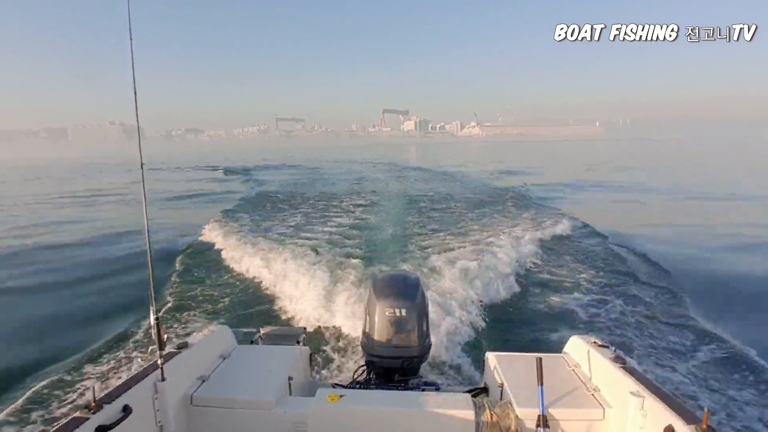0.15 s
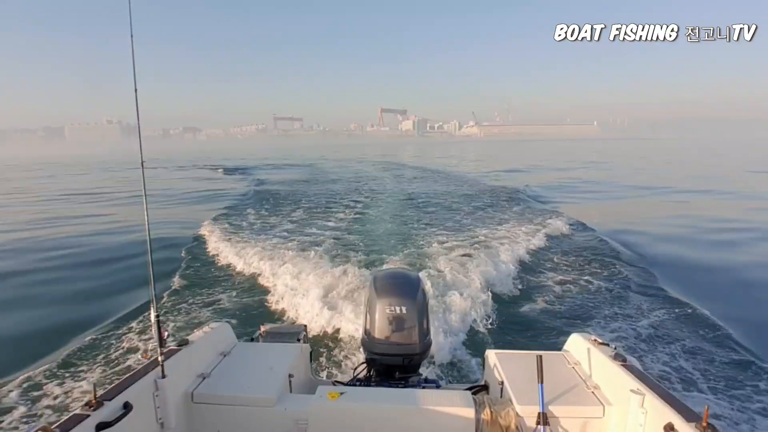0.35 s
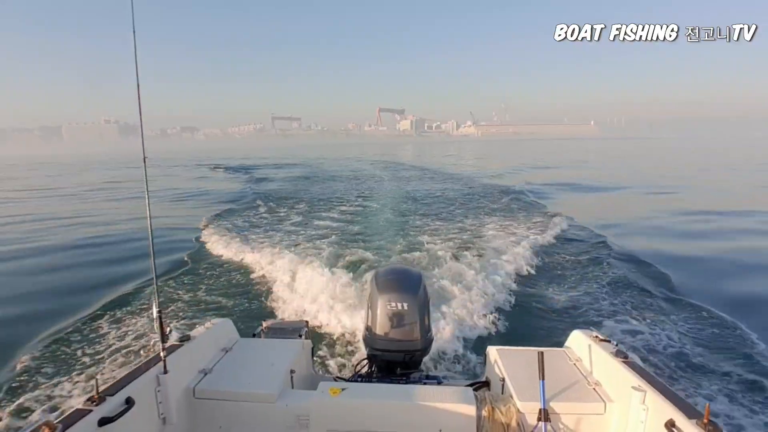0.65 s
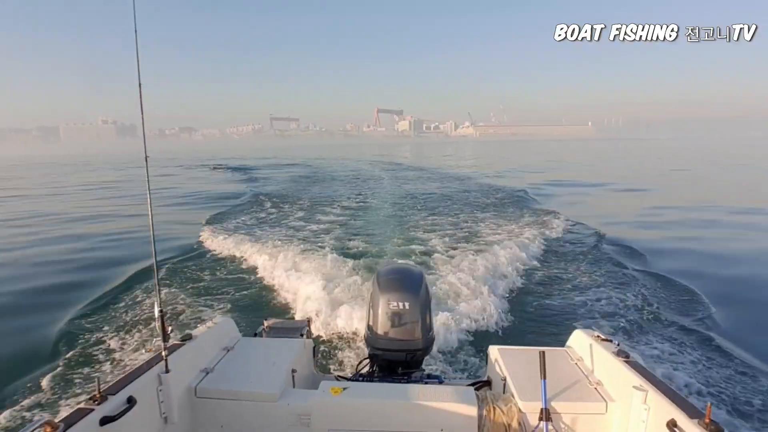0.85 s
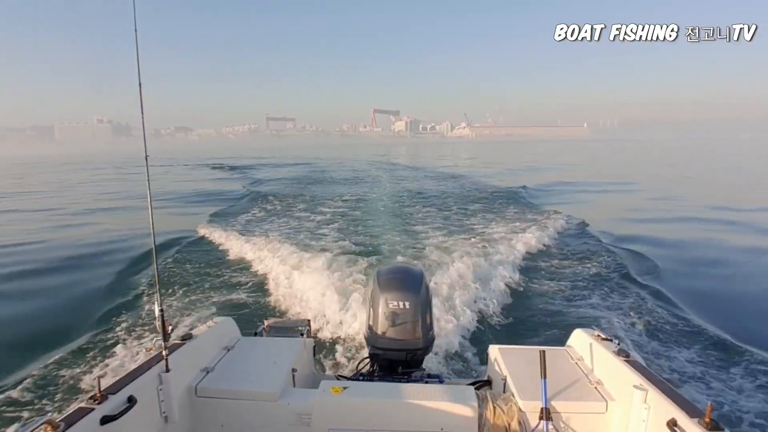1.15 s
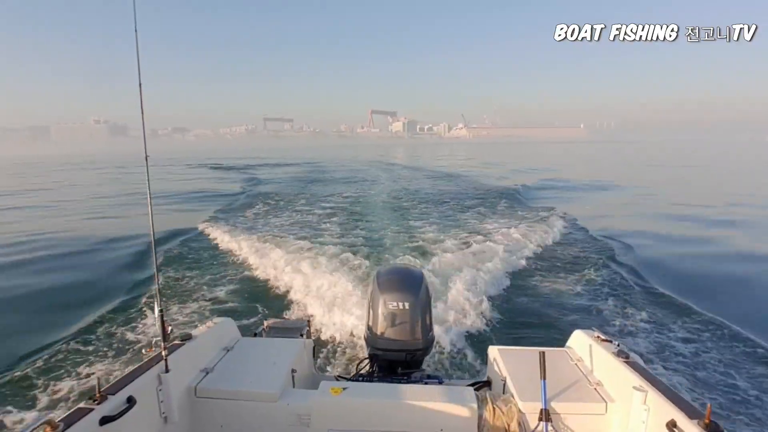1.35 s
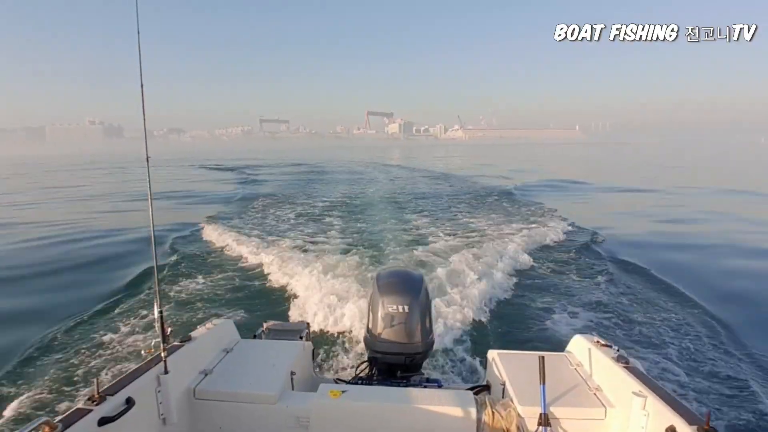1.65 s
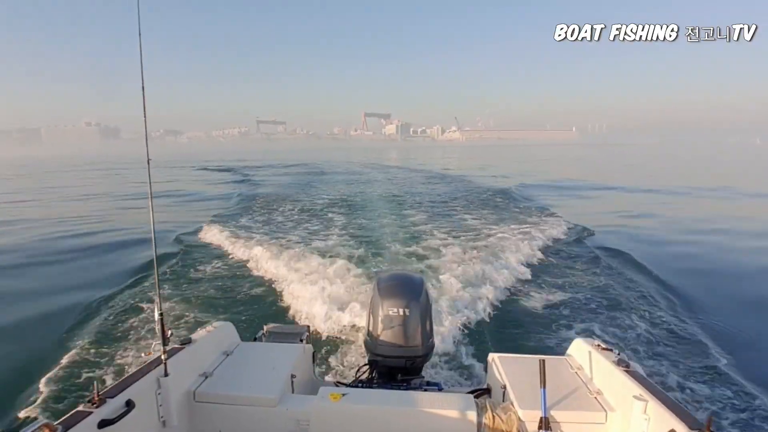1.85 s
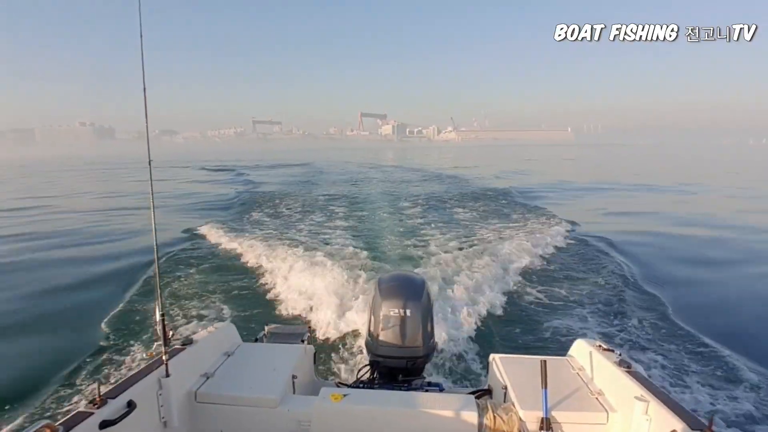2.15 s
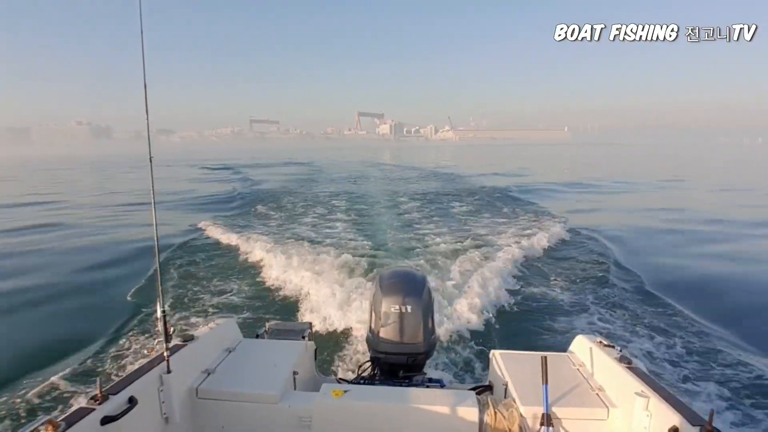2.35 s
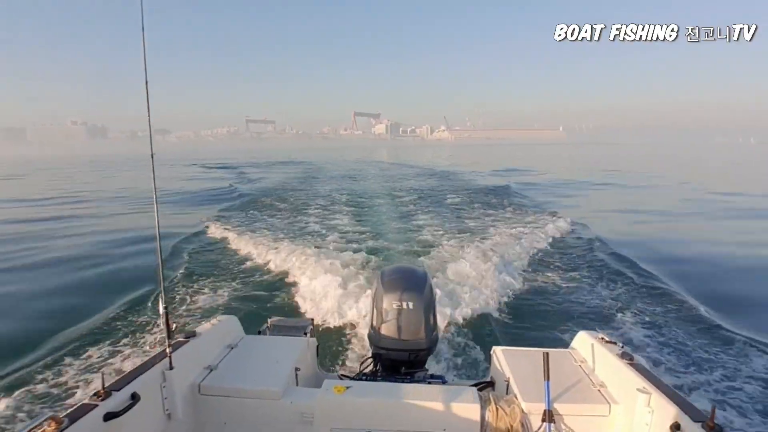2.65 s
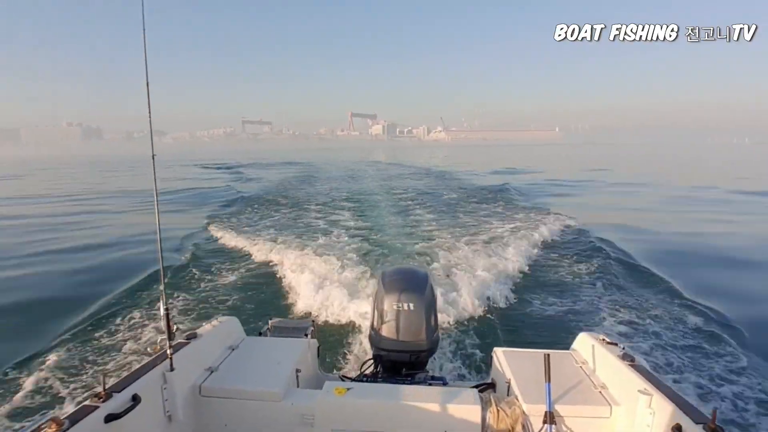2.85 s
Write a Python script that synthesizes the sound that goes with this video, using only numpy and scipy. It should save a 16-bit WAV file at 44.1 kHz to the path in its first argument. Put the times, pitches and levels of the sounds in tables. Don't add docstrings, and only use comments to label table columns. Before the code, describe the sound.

Constant deep hum of a small boat's outboard at cruising speed on open water, close stereo microphone on deck; rattling cover, wavering high gear whine and wide spray hiss continue throughout without any stop.

```python
import sys
import numpy as np
from scipy import signal
from scipy.fft import rfft, irfft
from scipy.io import wavfile

SR = 44100
rng = np.random.default_rng(int(sys.argv[2]) if len(sys.argv) > 2 else 0)


def transcribe(u):
    v = np.clip(np.atleast_2d(u).T, -1, 1)
    q = np.round(v * 32767).astype(np.int16)
    wavfile.write(sys.argv[1], SR, q)


def how_loud(loudness_db):
    steps = np.asarray(loudness_db, float) / 20
    return 10 ** steps


N = 132300
TIME = np.arange(N) / SR
LEFT_RIGHT_HALVES = np.array([[.5], [-.5]])


def rms_one(x):
    return x / np.sqrt(np.mean(x ** 2) + 1e-20)


def in_time(rows):
    seconds, *columns = np.transpose(rows)
    return [np.interp(TIME, seconds, column) for column in columns]


def at_hz(points, hz):
    points_hz, values = np.array(points).T
    return np.interp(np.log(hz), np.log(points_hz), values)


def drift(rate):
    pole = np.exp(-80 * np.pi * rate / SR)
    noise = rng.standard_normal(N // 40 + 2002)
    slow = signal.lfilter([1], [1, -2 * pole, pole * pole], noise)[2000:]
    slow = (slow - slow.mean()) / slow.std()
    return np.interp(np.arange(N) / 40, np.arange(len(slow)), slow)


def pair(mid, side, alike):
    alike = np.clip(alike, -1, 1)
    return np.sqrt(1 + alike) * mid + np.sqrt(1 - alike) * side * np.array([[1], [-1]])


def sides(pan_db):
    return how_loud(LEFT_RIGHT_HALVES * pan_db)


def ramp(start, length):
    return np.sin(np.pi / 2 * np.clip((TIME - start) / length, 0, 1)) ** 2


# pitch_hz, likeness (0 to 1)
WATER_LIKENESS = [(30, .96), (130, .97), (290, .96), (560, .7), (1000, .45), (2000, .4), (3500, .05),
                  (15000, 0)]
# pitch_hz, left_minus_right_db
WATER_PAN = [(60, -2.0), (130, -1.0), (290, -2.5), (640, -1.5), (1410, -1.0), (3100, 1.0), (6820, 1.5),
             (15000, -2.5)]


def water(spectrum, low_hz, high_hz, shared_db, own_db, rate):
    out, together = 0, drift(rate / 3)
    band_count = int(3 * np.log2(high_hz / low_hz))
    edges = low_hz * 2 ** (np.arange(band_count + 1) / 3)
    white = rng.standard_normal((2, 2, N + SR // 2))
    for k, (low, high) in enumerate(zip(edges, edges[1:])):
        band = signal.butter(2, [low, high], "band", fs=SR, output="sos")
        mid, side = signal.sosfilt(band, white[k % 2])[:, -N:]
        hz = np.sqrt(low * high)
        level_db = at_hz(spectrum, hz) + shared_db * together + own_db * drift(rate)
        gain = how_loud(level_db) * sides(at_hz(WATER_PAN, hz))
        out = out + gain * pair(mid, side, at_hz(WATER_LIKENESS, hz))
    return rms_one(out)


# pitch_hz, level_db (per Hz)
HULL_COLOUR = [(12, -58), (20, -19), (50, -7), (82, -5), (172, -11.5), (208, -15.5), (395, -10),
               (453, -15.5), (1150, -28.5), (1500, -69), (2530, -120)]
HULL_DB = -31.5


def hull_water():
    return how_loud(HULL_DB) * water(HULL_COLOUR, 20.08, 1150, shared_db=0.5, own_db=0.0, rate=2.0)


# pitch_hz, level_db (per Hz)
WAKE_COLOUR = [(900, -8), (1500, 2.5), (3200, -5.5), (4800, -1.5), (6400, -6), (7600, -18), (10000, -17.5),
               (15000, -17.5)]
# start_s, level_db
WAKE_SURGE = [(0.0, -39.5), (0.88, -38.5), (1.14, -40), (1.18, -38), (1.44, -40), (1.46, -36), (1.54, -39),
              (2.33, -38.5), (2.34, -37), (2.41, -39.5), (2.84, -38.5), (3.0, -40)]
WAKE_DB = 5.5
SURGE_SHARE, SURGE_TOP_HZ = .4, 7500


def wake(turn):
    surge_db, = in_time(WAKE_SURGE)
    spray = water(WAKE_COLOUR, 798, 20000, shared_db=.5, own_db=1.4, rate=28)
    high_pass = signal.butter(2, SURGE_TOP_HZ, "high", fs=SR, output="sos")
    fine = signal.sosfilt(high_pass, spray)
    held = how_loud((SURGE_SHARE - 1) * (surge_db - surge_db.mean()))
    pulse = 1 + 0.053 * np.cos(turn)
    return how_loud(WAKE_DB + surge_db) * pulse * (spray + (held - 1) * fine)


# pitch_hz, width_hz, level_db, left-right likeness (0 to 1)
MOTOR_RINGS = [(650, 200, -40.5, 0.75), (1304, 74, -48, 0.7), (1392.6, 22.6, -41, 0.91), (1434, 35, -41, 1),
               (1543, 70, -44.5, 0.48), (1642, 43, -40.5, 0.82), (1681, 25, -42.5, 0.25),
               (1798, 67, -43, 0.61), (1983, 167, -36, 0.89), (2082, 86, -38.5, 0.54),
               (2155, 27, -40.5, 0.86), (2320, 164, -39.5, 0.55), (2547, 120, -49, 0.42),
               (2875, 150, -46, 0.17),
               (567, 42, -52, .2), (1154, 26, -59, 0.61), (3100, 100, -51, .6), (3590, 220, -49, 0.48),
                (4747, 320, -49, 0.31), (5010, 79, -57, .7), (5920, 180, -68.5, 0.85),
                (6725, 200, -51.5, 0.32), (6990, 140, -51, 0.76)]
# pitch_hz, left_minus_right_db
RING_PAN = [(600, -.8), (1500, -2), (2000, -.3), (5000, 1.5)]
RASP_DEPTH = 0.26
COVER_PATCHY_DB, TREBLE_PATCHY_DB = 1.5, 2.5
PATH_SWAY_SAMPLES = 6
TREBLE_LEAD_SAMPLES = 8


def cowling(turn):
    out, n = 0, np.arange(N)
    pulse = 1 + RASP_DEPTH * np.cos(turn / 2)
    for hz, width_hz, db, alike in MOTOR_RINGS:
        pole, angle = np.exp(-np.pi * width_hz / SR), 2 * np.pi * hz / SR
        rung = rng.standard_normal((2, N)) * pulse
        for _ in range(2):
            rung = signal.lfilter([1, 0, -1], [1, -2 * pole * np.cos(angle), pole * pole], rung)
        treble = hz > 3000
        swayed = n + PATH_SWAY_SAMPLES * drift(4)
        left, right = pair(*rung, alike)
        left = np.interp(swayed + TREBLE_LEAD_SAMPLES * treble, n, left)
        right = np.interp(swayed, n, right)
        heard = rms_one(np.array([left, right]))
        patchy_db = TREBLE_PATCHY_DB if treble else COVER_PATCHY_DB
        out = out + how_loud(db + patchy_db * drift(7.3)) * heard * sides(at_hz(RING_PAN, hz))
    return out


# start_s, length_s, level_db
WHINE_SWELLS = [
    (0.105, 0.4, -33.5),
    (0.688, 0.28, -33.5),
    (1.065, 0.271, -31),
    (1.487, .2, -32),
    (1.802, 0.238, -33),
    (2.1, 0.31, -36),
    (2.559, 0.19, -32),
]
# start_s, pitch_hz
WHINE_PITCH = [(.1, 1915), (.9, 1913), (1.2, 1921), (1.6, 1925), (1.9, 1918), (2.2, 1926), (2.7, 1919)]
SWELL_EDGE_S, WHINE_REST_DB, SECOND_DB = 0.033, -48, -45
SECOND_TEETH = 21
WHINE_BLUR_RAD, WHINE_LEAD_RAD = .45, .5
WHINE_FLICKER_DB, WHINE_FLICKER_RATE_HZ = 2.0, 15
WHINE_PAN_DB = 3.5


def gears(turn):
    swell = how_loud(WHINE_REST_DB)
    for start_s, length_s, db in WHINE_SWELLS:
        rise = ramp(start_s, SWELL_EDGE_S)
        fall = 1 - ramp(start_s + length_s - SWELL_EDGE_S, SWELL_EDGE_S)
        swell = swell + how_loud(db) * rise * fall
    mesh_hz, = in_time(WHINE_PITCH)
    mesh = 2 * np.pi * np.cumsum(mesh_hz) / SR + WHINE_BLUR_RAD * drift(8.6)
    flicker = how_loud(WHINE_FLICKER_DB * drift(WHINE_FLICKER_RATE_HZ))
    first = swell * flicker * np.cos(mesh + WHINE_LEAD_RAD * LEFT_RIGHT_HALVES)
    second_mesh = SECOND_TEETH * turn + WHINE_BLUR_RAD * drift(7.3)
    second = how_loud(SECOND_DB + 2.67 * drift(3.1)) * np.cos(second_mesh)
    return np.sqrt(2) * (first * sides(WHINE_PAN_DB) + second * np.array([[1], [-.8]]))


# cycles per shaft turn, level_db (against the drone)
HULL_TONES = [(.75, -23), (1, -0.5), (1.75, -22.5), (3, -22.5), (3.25, -29), (3.75, -29.5), (4, -17),
              (5, -17.5), (7.25, -32), (8, -54)]
# cycles per shaft turn, before_db, after_db
SETTLING_TONES = [(6, -35, -20), (6.5, -28, -34.5), (7, -32, -27)]
# pitch_hz, left_minus_right_db
TONE_PAN = [(80, -1.9), (160, -1), (240, -2.6), (320, -2.6), (400, -2.2), (480, -2), (560, -4)]
SETTLE_S, SETTLE_LENGTH_S = 1.04, 0.12
DRONE_TRIM_DB, FIRING_TRIM_DB = 0.44, -1.3
WHOLE_WANDER_DB, PART_WANDER_DB, FIRST_WANDER_DB = .9, 2.5, .25
EVEN_LAG_RAD, LAG_WANDER_RAD, LEFT_LEAD_RAD = 2.07, .15, 0.31


def drone(turn, level_db, firing_db):
    out, settled = 0, ramp(SETTLE_S, SETTLE_LENGTH_S)
    firing = [(2, firing_db - level_db + FIRING_TRIM_DB)]
    settling = [(k, before + (after - before) * settled) for k, before, after in SETTLING_TONES]
    for k, db in HULL_TONES + firing + settling:
        wander_db = FIRST_WANDER_DB if k == 1 else PART_WANDER_DB if k % 1 else WHOLE_WANDER_DB
        lag = EVEN_LAG_RAD * (k % 2 == 0) + LAG_WANDER_RAD * (k != 1) * drift(3)
        lead = LEFT_LEAD_RAD / max(k, 1) * LEFT_RIGHT_HALVES
        gain = how_loud(db + wander_db * drift(6.3)) * sides(at_hz(TONE_PAN, 80 * k))
        out = out + gain * np.cos(k * turn + lag + lead)
    return np.sqrt(2) * how_loud(level_db + DRONE_TRIM_DB) * out


# start_s, turning_speed_hz, drone_level_db, firing_level_db
CRANKSHAFT = [(0, 79.95, -21.5, -25), (.2, 79.95, -20.3, -25), (.45, 79.95, -20, -27),
              (.65, 79.95, -20.3, -25.5), (.95, 80, -20.7, -28.5), (1.15, 80.05, -21.3, -26),
              (1.35, 80, -20, -29), (1.5, 80, -19.3, -27), (1.8, 80.05, -20, -31), (2.1, 80.1, -19.3, -28),
              (2.35, 80.1, -19, -30), (2.45, 80.05, -19.5, -26.5), (2.65, 80.05, -18, -25.5),
              (2.85, 80.1, -19, -29), (3, 80.1, -20.5, -30)]


def scene():
    speed_hz, level_db, firing_db = in_time(CRANKSHAFT)
    turn = 2 * np.pi * np.cumsum(speed_hz) / SR
    surroundings = hull_water() + wake(turn)
    motor = cowling(turn) + gears(turn) + drone(turn, level_db, firing_db)
    return surroundings + motor


def roll_off(x):
    return signal.sosfilt(signal.butter(12, 16220, fs=SR, output="sos"), x)


# pitch_hz, width_hz, change_db
HOUSING_DIPS = [(1088, 40, -5.5), (10000, 320, -5), (1463, 25, 0.5)]
CUTOFF_HZ = 15750


def record(dry):
    hz = np.arange(N // 2 + 1) * SR / N
    colour_db = sum(db * np.exp(-((hz - at) / width_hz) ** 2) for at, width_hz, db in HOUSING_DIPS)
    colour = how_loud(colour_db) * (hz < CUTOFF_HZ)
    mix = irfft(rfft(dry) * colour, N)
    return roll_off(mix)


dry = scene()
out = record(dry)
transcribe(out)
```